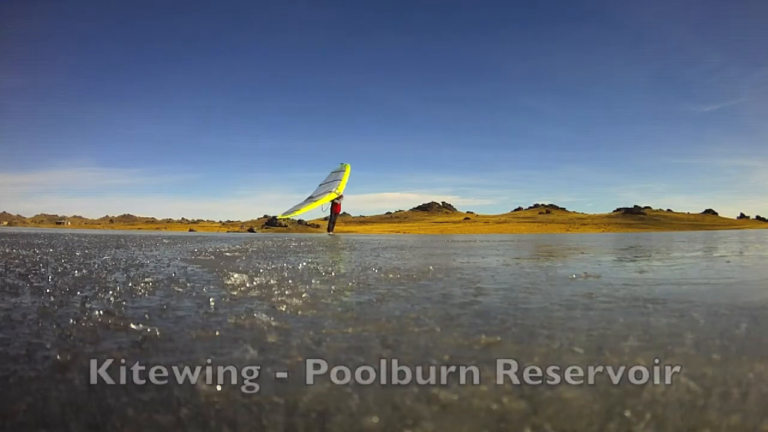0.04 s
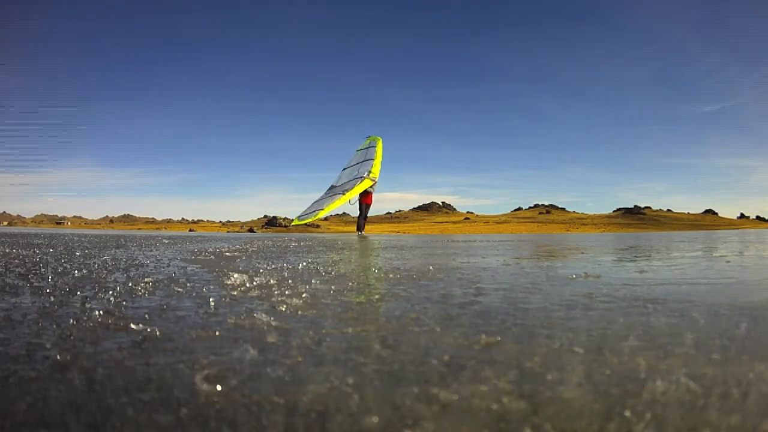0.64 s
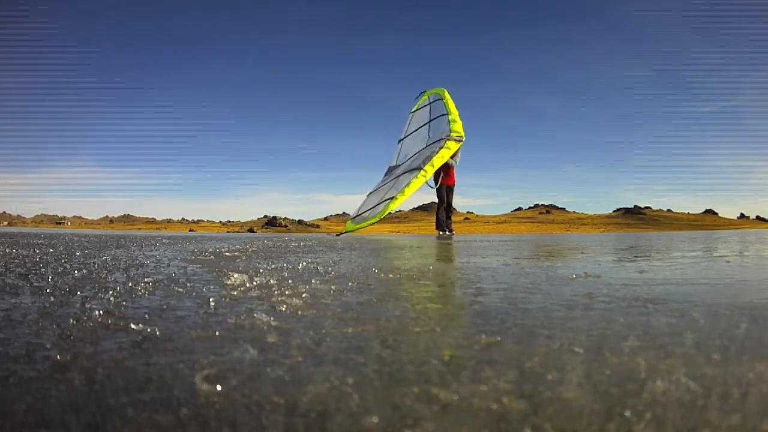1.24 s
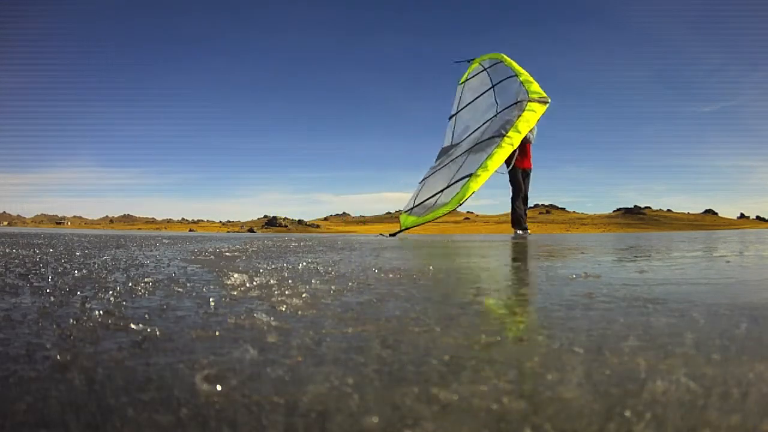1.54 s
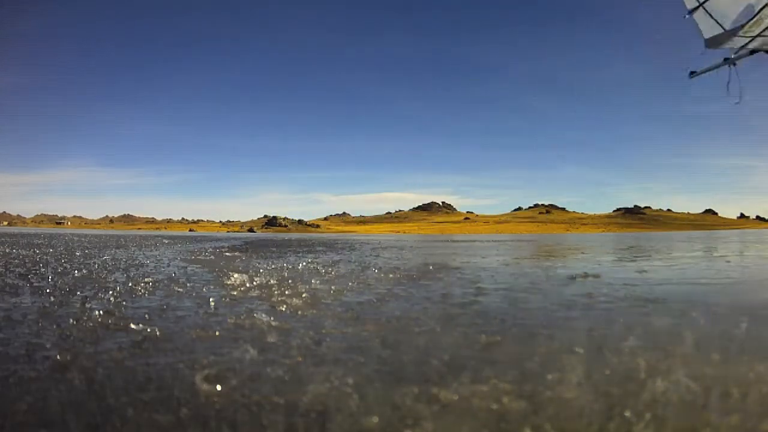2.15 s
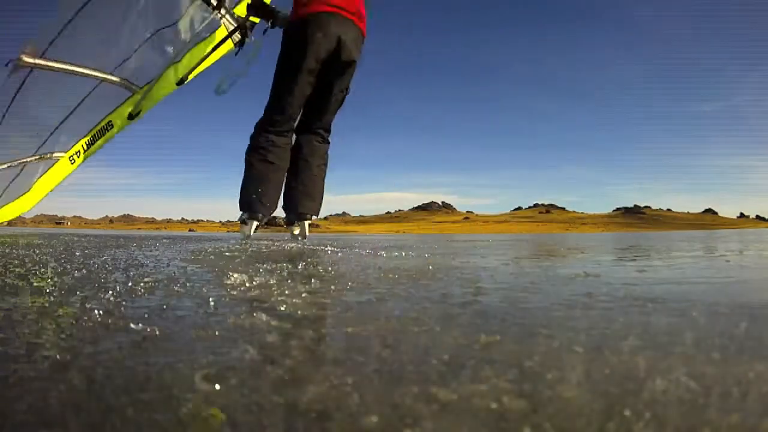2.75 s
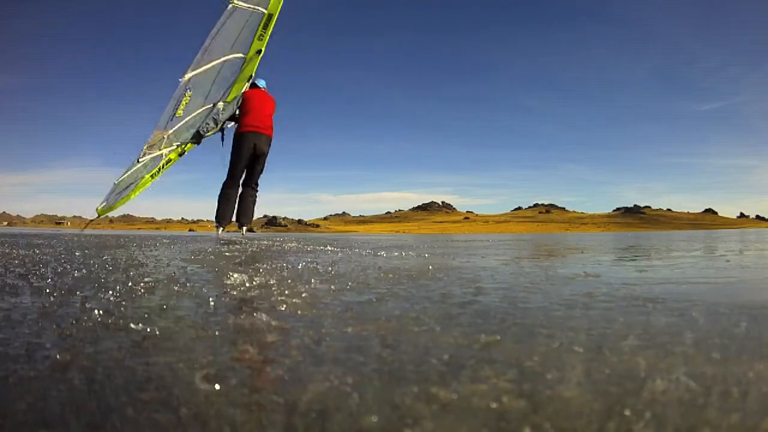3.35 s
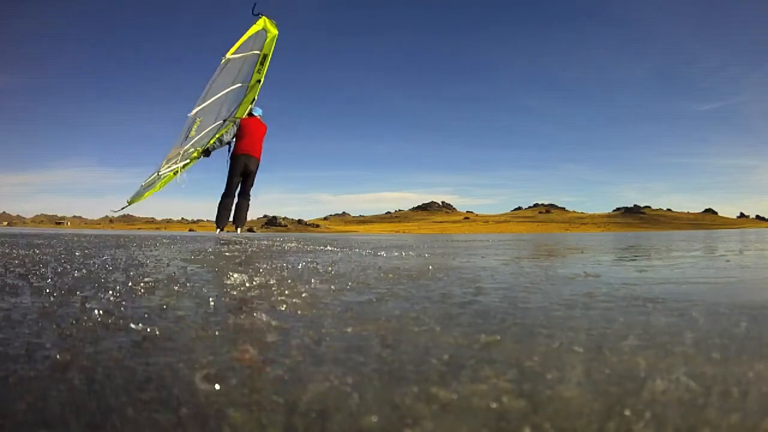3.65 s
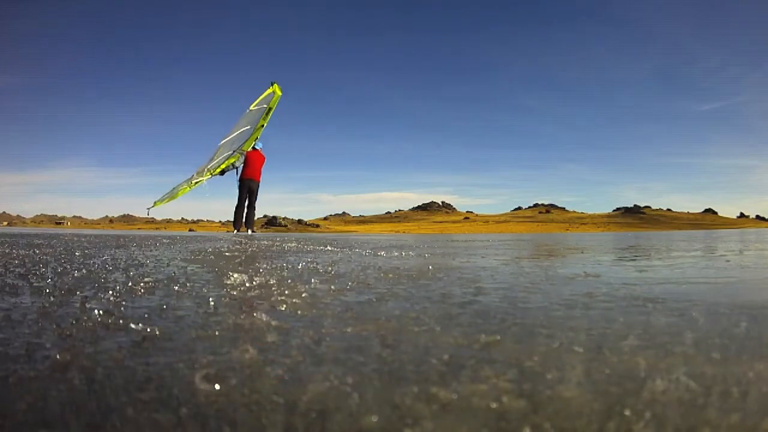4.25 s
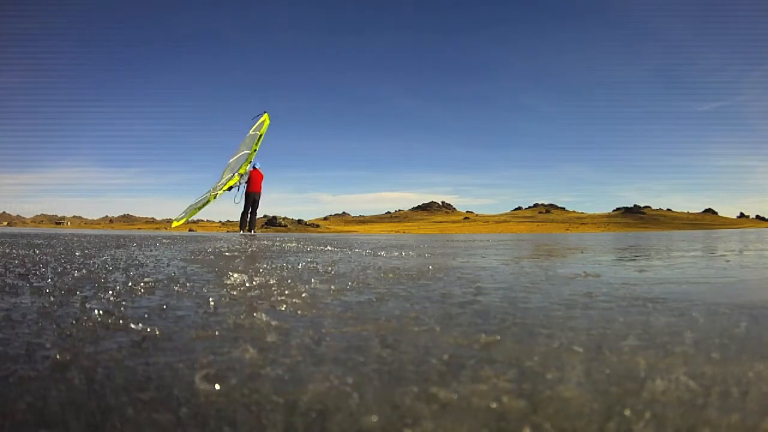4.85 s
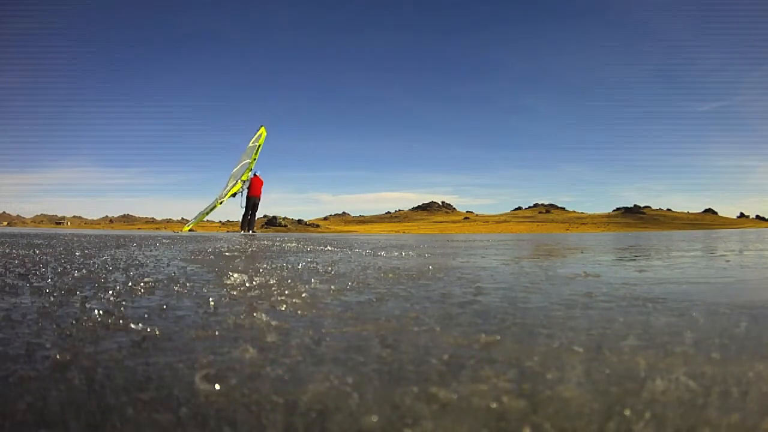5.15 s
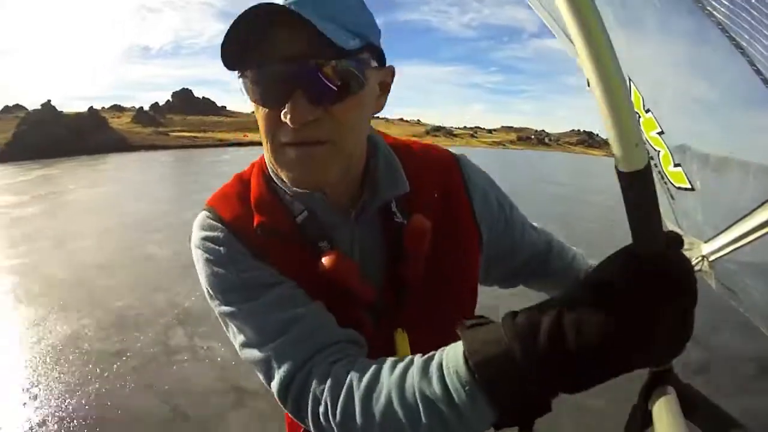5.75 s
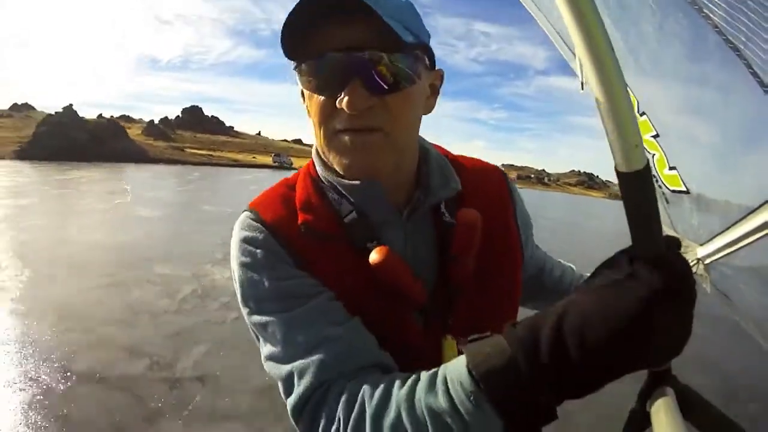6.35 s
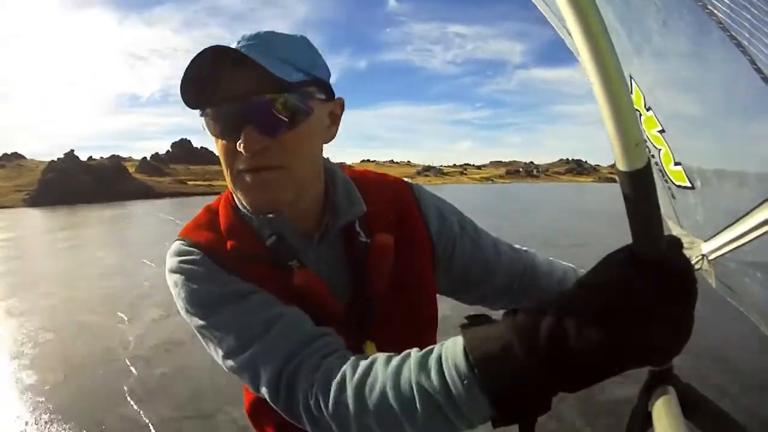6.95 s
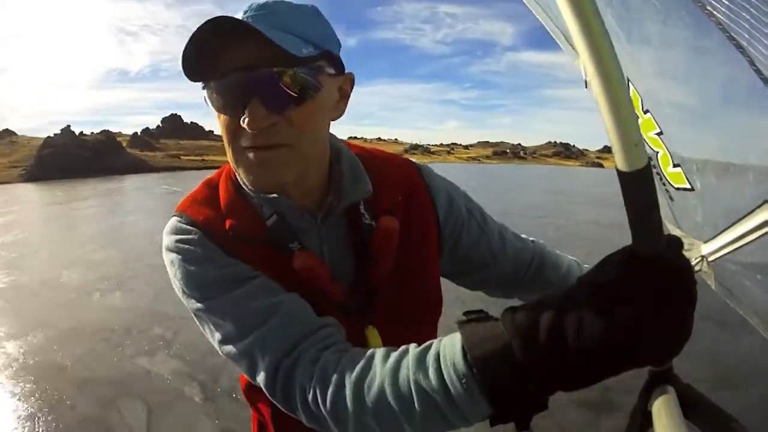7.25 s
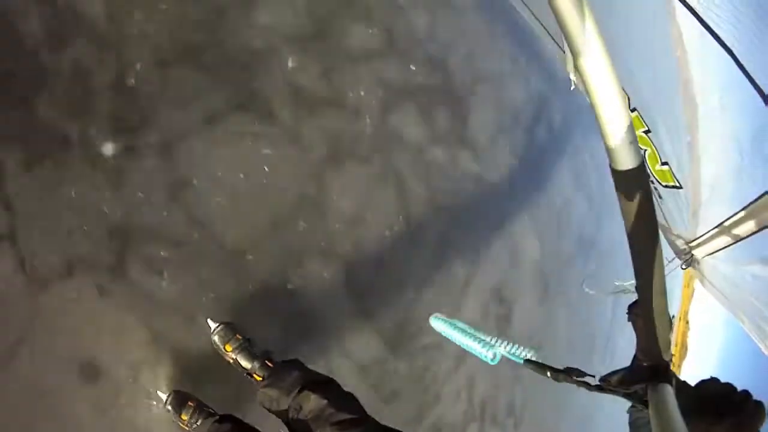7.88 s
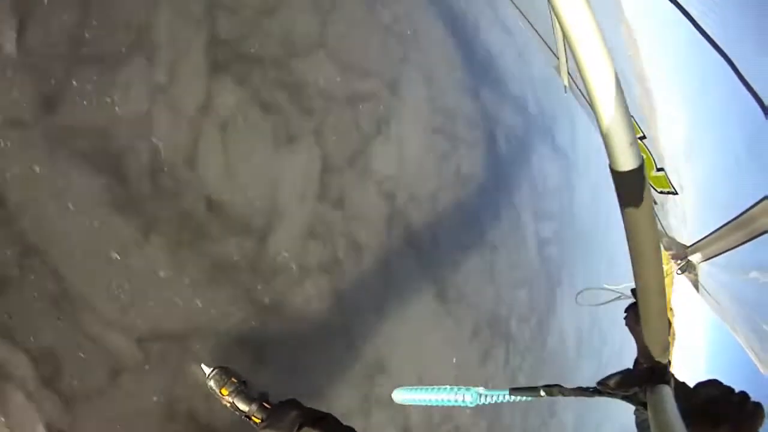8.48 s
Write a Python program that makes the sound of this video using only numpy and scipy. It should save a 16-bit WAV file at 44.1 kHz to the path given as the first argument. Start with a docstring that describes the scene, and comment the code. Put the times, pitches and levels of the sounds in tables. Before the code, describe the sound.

Skate blades approach, scrape by over rumbling ice and recede, followed by a close ride with wind rumble, hiss and clicking.

```python
"""First comes the low rumble and thin hiss of far-off skates on a frozen lake. A skater pulled by a
hand-held wing glides past a microphone lying on the ice, the blades scraping, squealing and clicking.
Ice carries treble faster than bass, so near bumps knock and distant ones arrive as falling chirps.
After a fade we ride on the wing: wind on the microphone, blade hiss in the frame, knocking spars
(the wing's poles) and a ticking microphone mount."""
import sys
import numpy as np
from scipy import signal
from scipy.fft import rfft, irfft, next_fast_len
from scipy.io import wavfile
from scipy.ndimage import map_coordinates

SR = 44100
rng = np.random.default_rng(int(sys.argv[2]) if len(sys.argv) > 2 else 0)


def wav_out(sig):
    """Save sig, one row per channel (or a flat mono array), as 16-bit PCM at SR to the path in sys.argv[1]."""
    wavfile.write(sys.argv[1], SR, np.round(np.clip(np.atleast_2d(sig).T, -1, 1) * 32767).astype(np.int16))


N = 375732
TIME = np.arange(N) / SR  # the time of every sample [s]
PASS_S, SPEED_M_S, NEAREST_M = 2.52, 7, 1.28  # when, how fast and how close the skater goes by


def amp(db):
    """Turn decibels into a gain to multiply by."""
    return 10 ** (np.asarray(db) / 20)


def unit(x):
    """Scale a sound to an average strength (rms) of 1."""
    return x / np.sqrt(np.mean(x ** 2) + 1e-20)


def burst(x, length_s=0.012):
    """Scale a short sound to the energy of length_s seconds at rms 1."""
    return x / np.sqrt(np.sum(x ** 2) / (length_s * SR) + 1e-20)


def curve(rows):
    """Join (time, value) points with straight lines, one value per sample."""
    return np.interp(TIME, *np.transpose(rows))


def wobble(rate):
    """A smooth curve through `rate` random values a second."""
    return map_coordinates(rng.standard_normal(2000), [TIME * rate], mode="wrap")


def add(track, s, sound):
    """Mix a sound into a track, starting at s seconds."""
    part = track[max(round(s * SR), 0):][:len(sound)]
    part += sound[:len(part)]


def colour(x, tone, size=8192):
    """Shape a sound's bass and treble with (frequency [Hz], level [dB]) points."""
    hz, db = np.transpose(tone)
    grid = np.log(np.fft.rfftfreq(size, 1 / SR) + 1)
    cepstrum = irfft(np.log(amp(np.interp(grid, np.log(hz), db, right=-90))))
    cepstrum[1:size // 2] *= 2  # folded so that the filter rings after a hit, never before
    cepstrum[size // 2 + 1:] = 0
    return signal.fftconvolve(x, irfft(np.exp(rfft(cepstrum))))[:len(x)]


def noise(tone):
    """Smooth noise with the given tone, at rms 1."""
    return unit(colour(rng.standard_normal(N), tone))


def grit(rate, smooth):
    """Tiny random hits, `rate` a second, plus a share of smooth rubbing."""
    hits = (rng.random(N) < rate / SR) * rng.standard_normal(N)
    return unit(hits) + smooth * rng.standard_normal(N)


# tone of the faint steady hiss (frequency [Hz], level [dB])
AIR_TONE = [(260, -19), (450, 2.5), (492, -8), (778, -8), (930, -1), (1660, -14.5), (3230, -14),
            (7840, -19.5), (8830, -15), (15500, -20.5)]
def background():
    """A low breeze under a faint hiss and a thin, high whine."""
    breeze = amp(-53) * noise([(20, 1.5), (110, -1), (200, -12), (500, -71)])
    whine = amp(-74) * np.sin(2 * np.pi * 11089 * TIME)
    return breeze + amp(-57.5) * noise(AIR_TONE) + whine


# how hard the wind blows on the ride (time [s], level [dB])
WIND_LEVEL = [(5.68, -26.5), (5.73, -28), (6.3, -35), (6.39, -31.5), (6.42, -29), (6.55, -26.5),
              (6.6, -26.5), (6.78, -28), (7.81, -30.5), (8.0, -34.5), (8.14, -33.5), (8.5, -33)]
# tones of its deep thumping and its higher rush (frequency [Hz], level [dB])
BUFFET_TONE = [(7.1, -50), (12, 5), (35, -0.5), (68, -6.5), (108, -15), (141, -14), (269, -26),
               (321, -27.5), (400, -36.5), (520, -67), (880, -120)]
RUSH_TONE = [(150, -28.5), (250, 1.5), (269, -5.5), (318, -0.5), (410, -2), (1180, -7), (1420, -3.5),
             (1800, -15.5), (2340, -15.5), (3960, -120)]
def wind(rush_db, rough_db):
    """Gusts thump the microphone; the frame's rush grows with the wind and with rough ice."""
    wind_db, gust = curve(WIND_LEVEL), wobble(30)
    above_average_db = wind_db - np.mean(WIND_LEVEL, axis=0)[1]
    buffet = amp(wind_db + 1.5 + 2 * gust) * noise(BUFFET_TONE)
    swell_db = 0.29 * rough_db + 0.73 * above_average_db + 0.21 * gust + 1.42 * wobble(60)
    return buffet + amp(rush_db + swell_db) * noise(RUSH_TONE)


# turns that cut into the ice (time [s], half length [s], spray boost [dB])
CARVING_TURNS = [(5.71, .04, 6.5), (7.343, 0.17, 7), (7.856, 0.032, 2), (8.32, 0.076, 7)]
# tones of the hiss in the frame and of flying ice (frequency [Hz], level [dB])
FRAME_TONE = [(1000, -70), (1700, -26), (1920, 6), (2050, 4.5), (2630, -5.5), (2730, -2.5), (2950, 7),
              (3090, 10), (3430, -3.5), (3840, 0), (4060, -6), (4680, 0.5), (5070, -28), (6500, -10),
              (7500, -20), (9750, -28), (16500, -120)]
SPRAY_TONE = [(3240, -6), (5500, -1), (6510, 0.5), (7780, -14.5), (8940, -5), (10400, -9), (12300, -38),
              (14500, -20), (15500, -23)]
def hiss_and_spray(hiss_db, spray_db, rough_db):
    """The blades hiss through the wing's frame; each turn swells the hiss and throws ice."""
    carve_db = sum(db * np.exp(-((TIME - s) / half) ** 2) for s, half, db in CARVING_TURNS)
    hiss = amp(hiss_db + 0.14 * rough_db + 0.43 * carve_db + wobble(35)) * noise(FRAME_TONE)
    spray = amp(spray_db + carve_db + 2.5 * wobble(40)) * noise(SPRAY_TONE)
    return hiss + spray


# notes the mount rings at (frequency [Hz], level [dB], time to fade by 60 dB [s])
MOUNT_NOTES = [(3170, 7.5, 0.0046), (3984, 11, 0.0096), (4350, 5, 0.011), (5300, 3, 0.0041)]
def mount_ring(detune=0):
    """One tap rings the mount; the pitch shifts a little with where it is touched."""
    t = np.arange(SR // 50) / SR
    ring = sum(amp(db - 60 * t / fade_s) * np.sin(2 * np.pi * hz * (1 + detune) * t)
               for hz, db, fade_s in MOUNT_NOTES)
    return colour(ring, [(1500, -8), (2700, -0.5), (3600, 4), (5400, 1.5), (7000, -12), (15000, -30)])


# ticks from the hardest jolts (time [s], level [dB])
MOUNT_TICKS = [(5.635, -43), (5.6515, -47.5), (5.656, -40), (5.6642, -41), (5.6862, -39), (5.694, -38.5),
               (5.7075, -43.0), (5.7514, -41.5), (5.841, -45), (5.9385, -43), (5.952, -46), (5.961, -42),
               (5.985, -48), (6.021, -47), (6.054, -45), (6.0793, -47), (6.087, -41.5), (6.124, -42),
               (6.194, -45), (6.244, -46.0), (6.296, -44.0), (6.3886, -45.0), (6.3967, -41), (6.407, -43),
               (6.434, -41.5), (6.51, -42.5), (6.5333, -51), (6.5572, -42), (6.5991, -49), (6.6216, -33),
               (6.655, -43), (6.893, -45), (6.9232, -39), (6.9515, -42.5), (7.019, -40), (7.0271, -42.5),
               (7.0762, -44), (7.138, -54), (7.181, -37.5), (7.335, -41), (7.408, -34.5), (7.42, -39.5),
               (7.4423, -43), (7.56, -35.5), (7.6099, -38), (7.62, -48), (7.6412, -37), (7.669, -36),
               (7.674, -38), (7.7393, -37), (7.848, -41.0)]
def mount(rattle_db, contact_s=0.0049):
    """The microphone's mount ticks on hard jolts and rattles grittily in between."""
    ticks, t = np.zeros(N), np.arange(SR // 50) / SR
    for s, db in MOUNT_TICKS:
        contact = rng.standard_normal(len(t)) * amp(-60 * t / contact_s)
        ring = mount_ring(detune=0.03 * rng.standard_normal())
        add(ticks, s, amp(db) * burst(signal.fftconvolve(contact, ring)))
    rattle = unit(signal.fftconvolve(grit(rate=420, smooth=0.048), mount_ring())[:N])
    return ticks + amp(rattle_db + 3 * wobble(110)) * rattle


# two listening spots on the wing, facing the skater and then the blades
# (start [s], fade-in [s], rush [dB], hiss [dB], spray [dB], rattle [dB])
WING_SPOTS = [(5.619, 0.091, -43.5, -47.5, -60.5, -49), (7.685, 0.09, -44.5, -50, -52.5, -52)]
# how rough the ice is on the ride (time [s], roughness [dB])
ICE_ROUGHNESS = [(5.71, 3), (5.8, -5), (5.91, -10), (5.955, -2), (6.01, -1), (6.08, -3), (6.16, -2),
                 (6.35, -2), (6.41, -1), (6.47, 1.5), (6.55, 3.5), (6.65, 1), (6.74, -4), (6.88, -6.5),
                 (7.05, 1.5), (7.11, 0.5), (7.24, -6), (7.33, 0.5), (7.44, 3), (7.53, 2.5), (7.62, 5.5),
                 (7.68, 7.5), (7.8, 1), (7.86, 4), (7.95, 0), (8.5, 2)]
def ride(cut_s=0.0062):
    """Wind, hiss and rattle on the wing; the sound dips briefly between the two spots."""
    spots = np.array(WING_SPOTS)
    current = np.maximum(np.searchsorted(spots[:, 0], TIME) - 1, 0)
    start, fade_s, rush_db, hiss_db, spray_db, rattle_db = spots[current].T
    fade = np.clip((TIME - start) / fade_s, 0, 1)
    fade *= np.clip(np.abs(TIME - spots[-1, 0]) / cut_s, 0, 1)
    rough_db = curve(ICE_ROUGHNESS)
    rushing = wind(rush_db, rough_db) + hiss_and_spray(hiss_db, spray_db, rough_db)
    return fade * rushing + np.sqrt(fade) * mount(rattle_db + 1.55 * rough_db)


# knocks on the wing's poles (time [s], peak level [dB], pitch [Hz])
SPAR_HITS = [(5.685, -29, 1223), (5.782, -35.5, 1340), (5.801, -35, 2990), (5.83, -38, 2160),
             (5.836, -30.5, 1090), (6.009, -39, 1460), (6.405, -38, 1160), (6.522, -34, 1000),
             (6.786, -34, 343), (6.846, -30.5, 945), (7.321, -35, 2920), (7.379, -33, 3000),
             (7.785, -39.5, 1000), (8.198, -34.5, 657)]
# notes of one pole (frequency [times its pitch], level [dB])
SPAR_NOTES = [(.89, -9.5), (1, -1.5), (1.13, -8)]
def spars(attack_s=0.0017, fade_s=0.054):
    """A jolt knocks a pole: a few close notes start together and die quickly."""
    out, t = np.zeros(N), np.arange(SR // 8) / SR
    envelope = (1 - np.exp(-t / attack_s)) * amp(-60 * t / fade_s)
    for s, db, hz in SPAR_HITS:
        knock = envelope * sum(amp(level) * np.sin(2 * np.pi * (hz * ratio * t + rng.random()))
                               for ratio, level in SPAR_NOTES)
        add(out, s, amp(db) * knock / np.abs(knock).max())
    return out


def distance(s):
    """Metres from the skater to the microphone on the ice at time s."""
    return np.hypot(NEAREST_M, SPEED_M_S * (s - PASS_S))


def through_ice(x, s, share=1, wave_m_s=1400):
    """Waves bend the ice, and low ones travel slower: the farther off, the later the bass arrives."""
    size = next_fast_len(len(x) + SR // 4)
    hz = np.fft.rfftfreq(size, 1 / SR)
    slowness = np.clip(hz / 1000, .14, 4) ** -.5 - .5  # wave_m_s is the speed at 1 kHz
    lag_s = share * distance(s) / wave_m_s * slowness
    return irfft(rfft(x, size) * np.exp(-2j * np.pi * np.cumsum(lag_s) * SR / size), size)


def carried(x, size=4096):
    """Send a long sound through the ice, piece by piece, from wherever the skater is."""
    out, padded = np.zeros(N + size), np.pad(x, (size, 0), mode="wrap")
    for start in range(0, N + size, size):
        add(out, start / SR, through_ice(padded[start:start + size], (start - size) / SR))
    return unit(out[size:])


# loudness of the distant gliding (time [s], level [dB])
FAR_GLIDE_LEVEL = [(0, -54.5), (.28, -57.5), (.36, -62.5), (.58, -64), (.9, -51), (1.45, -60), (1.9, -86),
                   (4.0, -72), (4.65, -65), (5.2, -61.5), (5.55, -71)]
# its tone (frequency [Hz], level [dB])
GLIDE_TONE = [(1000, -27), (1400, -2.5), (1850, -9), (2300, -3), (3200, 1.5), (4130, -12), (4600, -2),
              (5500, -6), (6100, -19), (6800, -11), (8000, -24)]
def glide():
    """Far off, the running blades make a thin, gritty hiss."""
    level_db = curve(FAR_GLIDE_LEVEL) + 1.7 * wobble(39.2)
    return amp(level_db) * unit(colour(grit(rate=400, smooth=0.71), GLIDE_TONE))


# brief squeals (time [s], level [dB], pitch [Hz], slide [Hz/s], half width [Hz], half length [s])
EDGE_SQUEALS = [(0.14, -63, 3130, 4, 200, 0.24), (0.657, -61, 3240, 398, 150, 0.24),
                (1.079, -56, 3410, 2, 130, .17), (1.02, -51, 2350, 0, 130, 0.079),
                (1.304, -51, 2300, -150, 130, .06), (2.255, -55, 3050, -500, 90, 0.075),
                (2.41, -55, 3220, 2500, 90, .05), (2.64, -52, 3170, 1500, 90, 0.039),
                (2.807, -44, 3000, -1000, 80, .05), (2.787, -44, 2350, -300, 50, 0.036),
                (2.941, -45, 2320, -200, 140, .07), (3.044, -53, 3420, -1200, 90, 0.038),
                (8.35, -50, 2260, 2, 90, 0.068), (8.359, -47.5, 3120, -47, 100, 0.11)]
def squeals():
    """A blade's edge grips and sings: rubbing feeds one note that swells, slides and dies away."""
    out = np.zeros(N)
    for s, db, hz, slide, width, half in EDGE_SQUEALS:
        t = np.arange(-min(s, 3 * half), 3 * half, 1 / SR)
        lowpass = signal.butter(2, width, fs=SR, output="sos")
        rub = signal.sosfilt(lowpass, rng.standard_normal((2, len(t))))
        phase = 2 * np.pi * (hz * t + slide * t ** 2 / 2)
        note = unit(rub[0] * np.cos(phase) + rub[1] * np.sin(phase))
        add(out, s + t[0], amp(db) * np.exp(-(t / half) ** 2) * note)
    return out


# hits on bumps and cracks (time [s], thud [dB], knock [dB], crack [dB], sizzle [dB])
ICE_BUMPS = [(.907, -44, -56, -47, -64), (1.199, -50, -58, -61, -53), (1.43, -37, -40.5, -68, -59),
             (1.5004, -43, -47, -71, -68), (1.5173, -40, -45, -59, -50), (1.66, -38.5, -47, -68, -59),
             (1.757, -39, -43, -54, -57), (1.791, -30, -39.5, -66, -61), (1.852, -40, -39, -49, -41),
             (2.019, -35, -39, -54, -66), (2.193, -31, -33.5, -62, -51), (2.531, -27, -22, -29.5, -34),
             (2.538, -58, -35, -35, -41), (2.556, -54, -43, -34, -41), (2.5602, -34, -30.5, -31, -26.5),
             (2.566, -44, -30.5, -36, -39), (2.616, -40, -46, -50, -57), (2.662, -29, -33, -52, -63),
             (2.709, -30.5, -32, -37, -40), (2.725, -29, -23, -24.5, -29.5), (2.763, -29.5, -38, -52, -59),
             (2.808, -32, -49, -48, -51), (3.041, -32, -34, -45, -51), (3.173, -46, -35, -51, -50),
             (3.191, -36.5, -32.5, -37.5, -49), (3.2167, -47, -39, -43, -37), (3.227, -38, -34, -44, -46),
             (3.609, -38.5, -55, -68, -61), (3.854, -58, -46.5, -47.5, -52), (3.918, -47, -55, -77, -72),
             (4.07, -45.5, -67, -75, -72), (4.632, -40, -56, -78, -75), (4.654, -45, -56, -76, -75),
             (4.688, -42, -52.5, -76, -75), (4.732, -59, -50, -73, -75), (4.768, -47, -53, -76, -75),
             (4.802, -43, -51, -78, -75), (4.843, -40, -48, -59, -62), (4.869, -38, -51, -53, -66),
             (4.91, -45, -54, -74, -75), (4.942, -49, -55, -78, -75), (5.004, -52, -51.5, -69, -61),
             (5.035, -47, -54, -62, -64), (5.225, -36, -54, -68, -68), (5.254, -49, -51, -59, -69),
             (5.264, -41, -40.5, -54, -56), (5.313, -40, -41.5, -53, -57), (5.317, -49, -54, -59, -63),
             (5.362, -45, -56, -62, -62)]
# tones of the parts of a hit (frequency [Hz], level [dB])
THUD_TONE = [(40, -9.5), (180, 2), (400, 6), (520, -13.5), (800, -17), (2000, -32.5)]
FAR_KNOCK_TONE = [(400, -21), (720, -10.5), (1000, 9), (1270, -9.5), (1550, -10.5), (2000, -16.5),
                  (3200, -41)]
NEAR_KNOCK_TONE = [(250, -31), (720, -8.5), (1000, 14), (1270, 5), (1550, 6.5), (2000, -17), (3200, -33)]
CRACK_TONE = [(1400, -30), (1900, 1.5), (2300, -10.5), (2600, -9.5), (3050, 8), (3500, -1), (4150, -1),
              (4600, 1.5), (5900, -12.5), (6500, -4), (7900, -19.5), (14000, -48)]
SIZZLE_TONE = [(4590, -9.5), (7800, -14.5), (8260, -3), (8800, 4.5), (9590, -9.5), (10200, -6.5),
               (10500, -9), (11700, -10.5), (13200, -22), (14700, -11.5), (15500, -49)]  # also used by sizzle()
def bumps(crush_s=0.001007, crumble_s=0.0071, near_m=2.5, chirp_m=13.84):
    """A blade crushes a ridge: the ice thuds and knocks, the edge cracks and throws chips."""
    out, t = np.zeros(N), np.arange(SR // 10) / SR
    for s, thud_db, knock_db, crack_db, sizzle_db in ICE_BUMPS:
        far = np.clip(distance(s) / chirp_m, .3, 1)  # far hits chirp more and trail off longer
        envelope = t / crush_s * np.exp(-t / crush_s) + far * 0.38 * np.exp(-t / crumble_s)
        crush = rng.standard_normal(len(t)) * envelope
        blow = crush / np.linalg.norm(crush)
        blow[round(crush_s * SR)] += 0.7  # the blade's single push
        knock_tone = NEAR_KNOCK_TONE if distance(s) < near_m else FAR_KNOCK_TONE
        parts = [(thud_db, THUD_TONE), (knock_db, knock_tone), (crack_db, CRACK_TONE)]
        hit = sum(amp(db) * burst(colour(blow, tone)) for db, tone in parts)
        chips = colour(crush, [(7000, -0.5), (8800, 8), (10000, 2), (16000, 3)])
        add(out, s, through_ice(hit, s, share=far))
        add(out, s, amp(sizzle_db) * burst(colour(chips, SIZZLE_TONE)))
    return out


def sizzle(near, chatter):
    """The edges fizz on the ice, a little brighter close by."""
    fizz = unit(colour(grit(rate=230, smooth=1), SIZZLE_TONE))
    bright = colour(fizz, [(9000, 0.9), (12000, 1), (16000, 2)])
    level_db = blade_db(-47.5, bite=0.5, falloff=0.5, leaving_db=-2) + 1.7 * chatter
    return amp(level_db) * ((1 - near) * fizz + near * bright)


# how hard the edges dig in as the skater passes (time [s], bite [dB])
EDGE_BITE = [(0, -1.5), (.24, -12), (.35, -17), (.62, 2), (.85, 2), (.9, 7), (1.0, 8.5), (1.13, 10),
             (1.26, 5.5), (1.4, 2), (1.56, -1.5), (1.96, -5.5), (2.03, -2.5), (2.12, -6.5), (2.27, -4),
             (2.4, -2.5), (2.5, -3.5), (2.65, 0.5), (2.88, 2.5), (3.08, -4), (3.23, 4.5), (3.33, -4.5),
             (4.48, -11), (4.68, -3.5), (5.15, -10.5), (5.28, 2.5), (5.45, -16)]
def blade_db(base_db, bite, falloff, leaving_db, leaving_s=1):
    """A blade sound grows with bite, falls with distance and is weaker behind the skater."""
    distance_db = 20 * np.log10(distance(TIME) / NEAREST_M)
    gone_by = np.clip((TIME - PASS_S) / leaving_s, 0, 1)
    return base_db + bite * curve(EDGE_BITE) - falloff * distance_db + leaving_db * gone_by


def ripples(per_second=28, jitter=0.11, contact_s=0.0012):
    """Rippled ice jolts the blades almost regularly, each time with a short crunch."""
    count = 9 * per_second
    times = (np.arange(count) + 1 + jitter * rng.standard_normal(count)) / per_second
    jolts = np.bincount(np.abs(times * SR).astype(int), np.ones(count), N)[:N]
    tails = signal.lfilter([1], [1, -np.exp(-1 / (contact_s * SR))], jolts)
    return unit(unit(jolts) + .6 * unit(tails * rng.standard_normal(N)))


# the rumble follows how coarse the ice is more than distance (time [s], level [dB])
SHEET_LEVEL = [(0, -38), (.22, -39.5), (.36, -42), (.62, -38), (.97, -35.5), (1.15, -38.5), (1.45, -40),
               (2.1, -43), (2.35, -39), (2.8, -39.5), (3.2, -40.5), (3.4, -46.5), (4.1, -49), (4.42, -53),
               (4.7, -46), (5.1, -49.5), (5.3, -44), (5.55, -48)]
# tones of the rumble, the ring and the extra brightness close by (frequency [Hz], level [dB])
RUMBLE_TONE = [(12, -33), (20, -20), (80, -9), (235, 0.5), (334, -3), (389, 2), (413, 1), (489, -19),
               (578, -12.5), (643, -24), (760, -48), (990, -59), (1670, -120)]
RING_TONE = [(290, -41), (500, -18.5), (575, -5.5), (634, -15), (721, -14), (805, -13.5), (898, 5),
             (991, 2.5), (1140, -1), (1350, -14.5), (1450, -12), (1570, -11), (1720, -27), (2000, -40),
             (2600, -27), (4400, -120)]
NEAR_BRIGHTNESS = [(250, 0), (450, 4), (780, 0.5), (950, -0.5), (1300, 0), (1750, 7.5), (2300, 11)]
def ice_sheet(fine_grit, near, chatter):
    """Pebbly, rippled ice shakes under the blades, so the whole sheet rumbles and rings."""
    patches_db = 0.96 * wobble(13)  # stretches of rough and smooth ice
    jolts = carried(ripples())
    coarse_grit = carried(grit(rate=400, smooth=0.66))
    rippled = np.interp(TIME, [4, 4.7], [.2, .86])  # far out, ripples stand clear as chirps
    rumble = unit(colour(coarse_grit + (0.28 + rippled) * jolts, RUMBLE_TONE))
    ring = unit(colour(np.sqrt(1 - rippled ** 2) * fine_grit + rippled * jolts, RING_TONE))
    rumble_db = curve(SHEET_LEVEL) + 0.76 * chatter
    ring_db = blade_db(-29, bite=1.44, falloff=1.04, leaving_db=-1.5) + 0.85 * chatter
    sheet = amp(rumble_db + patches_db) * rumble + amp(ring_db + patches_db) * ring
    return (1 - near) * sheet + near * colour(sheet, NEAR_BRIGHTNESS)


def two_blades(x, gap_m=0.479, air_m_s=343):
    """One blade runs ahead of the other: the tiny delay sweeps the tone up, then down on leaving."""
    lag_s = gap_m / air_m_s * np.abs(SPEED_M_S * (TIME - PASS_S)) / distance(TIME)
    return x + 0.33 * np.interp(TIME - lag_s, TIME, x)


# tones of the scrape from in front, from behind and from far off (frequency [Hz], level [dB])
FRONT_TONE = [(1060, -22), (1800, -5), (2050, -7), (2550, -1), (3100, 0.5), (3550, -2.5), (4000, -2),
              (4400, -9.5), (5150, -11), (5950, -28), (6430, -10), (7800, -32), (12000, -77)]
BACK_TONE = [(1060, -20), (1950, -6), (2320, -7), (2570, -7), (3020, 0.5), (3400, -1.5), (3600, -7),
             (3850, 1), (4170, -14), (4500, -3), (4900, -10), (5300, -15), (5600, -11.5), (5950, -25),
             (6350, -12.5), (7800, -28), (12000, -72)]
FAR_TONE = [(1120, -57), (1900, -46), (2090, -37), (2280, 3), (2520, -40), (2870, -12), (3350, 2),
            (3910, -11), (4120, -84), (4370, -2), (4560, -8), (5570, -6.5), (6160, -27), (6930, -12),
            (7800, -47), (10100, -58), (17200, -120)]
def scrape(fine_grit, near, chatter, turn_s=0.42):
    """Steel edges scrape the ice; as they go by we hear their front, then their back."""
    behind = np.clip(.5 + (TIME - PASS_S) / turn_s, 0, 1)
    front = unit(colour(fine_grit, FRONT_TONE))
    back = unit(colour(grit(rate=2100, smooth=0.93), BACK_TONE))
    close = unit(two_blades(np.sqrt(1 - behind) * front + np.sqrt(behind) * back))
    distant = unit(colour(grit(rate=700, smooth=0.4), FAR_TONE))
    level_db = blade_db(-36.5, bite=1.09, falloff=1.29, leaving_db=-5.5) + 1.3 * chatter
    return amp(level_db) * (np.sqrt(near) * close + np.sqrt(1 - near) * distant)


def blades(near_m=3.83):
    """Steel runs over ice: rumble, scrape and sizzle flutter together as the grip changes."""
    chatter = wobble(40)
    fine_grit = carried(grit(rate=2500, smooth=0.85))
    near = np.clip(near_m / distance(TIME), 0, 1) ** 2  # 1 close by, towards 0 far off
    sheet = ice_sheet(fine_grit, near, chatter)
    return sheet + scrape(fine_grit, near, chatter) + sizzle(near, chatter)


def scene(pass_end_s=5.6, pass_fade_s=0.072):
    """The pass heard from the ice, then the ride on the wing, both over a quiet background."""
    ride_start_s, ride_fade_s = WING_SPOTS[0][:2]
    on_ice = np.clip((pass_end_s - TIME) / pass_fade_s, 0, 1)
    on_wing = np.clip((TIME - ride_start_s) / ride_fade_s, 0, 1)
    sound = (on_ice + on_wing) * background()
    sound += on_ice * (blades() + glide() + bumps())
    sound += ride() + spars() + squeals()
    return np.tile(sound, (2, 1))


def record(dry, top_hz=15550):
    """One microphone on both channels, picking up nothing above top_hz."""
    size = next_fast_len(N + SR // 4)
    audible = np.fft.rfftfreq(size, 1 / SR) < top_hz
    return irfft(rfft(dry, size) * audible, size)[:, :N]


dry = scene()
out = record(dry)
wav_out(out)
```